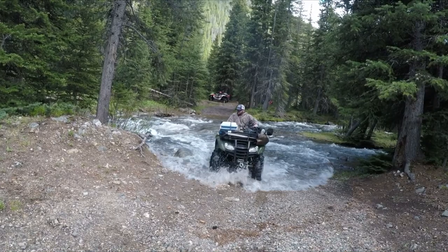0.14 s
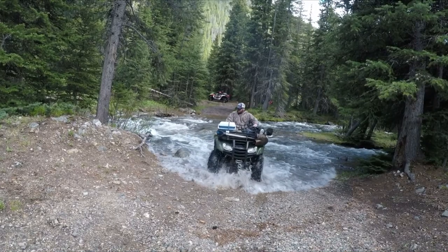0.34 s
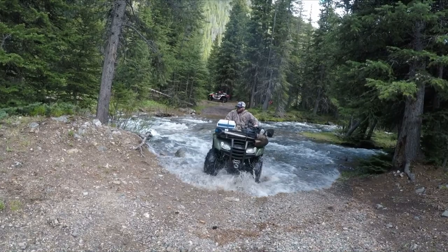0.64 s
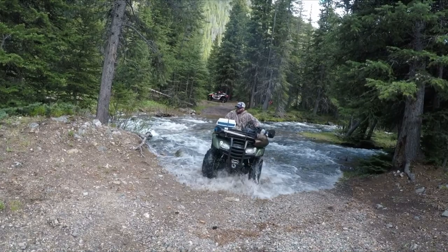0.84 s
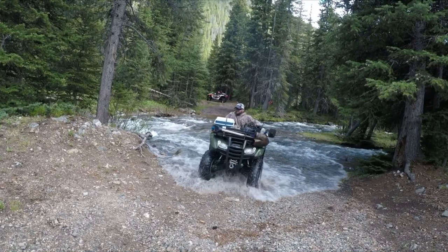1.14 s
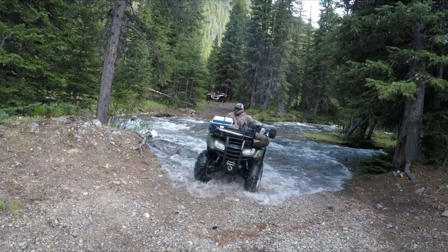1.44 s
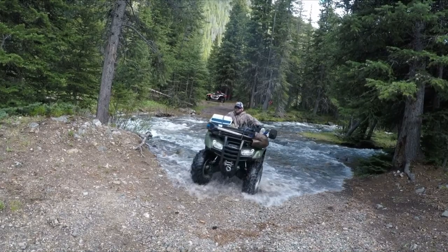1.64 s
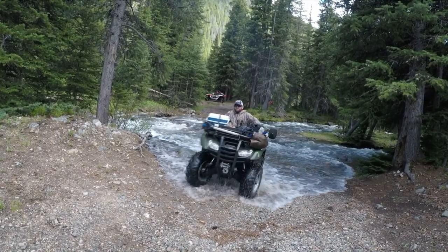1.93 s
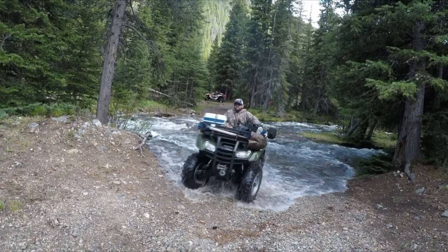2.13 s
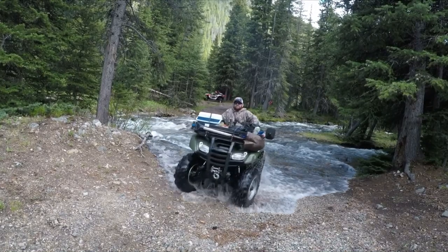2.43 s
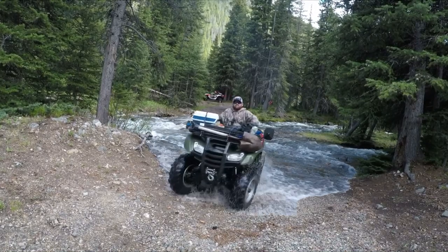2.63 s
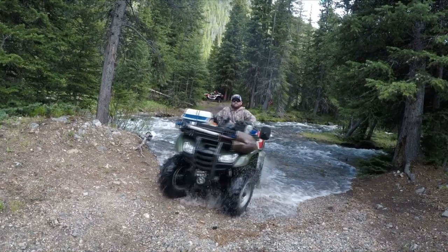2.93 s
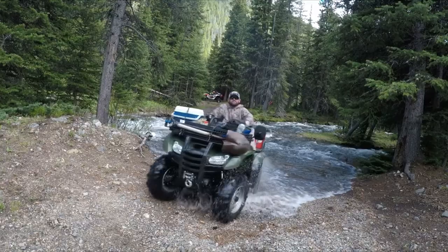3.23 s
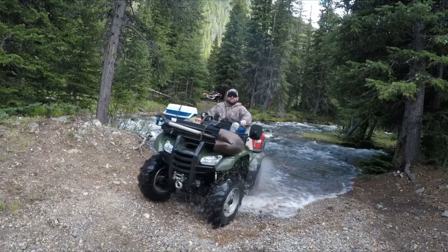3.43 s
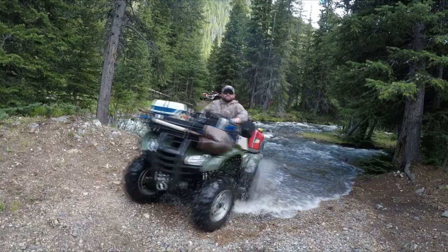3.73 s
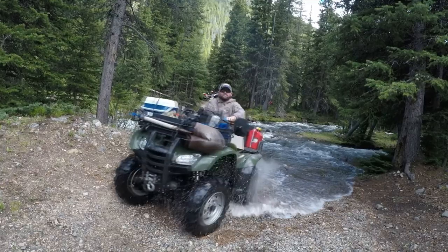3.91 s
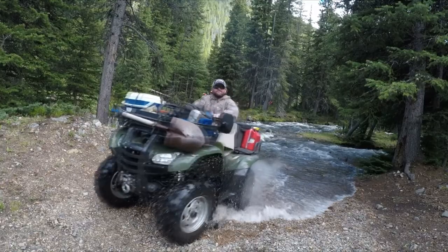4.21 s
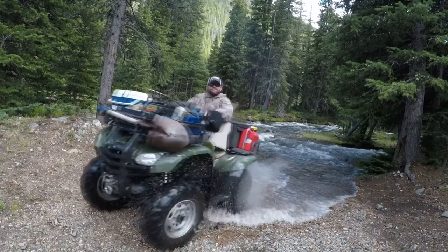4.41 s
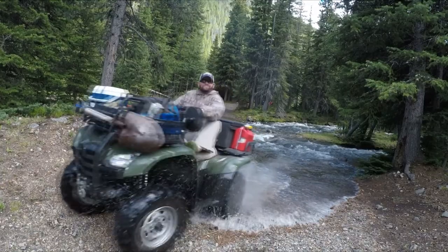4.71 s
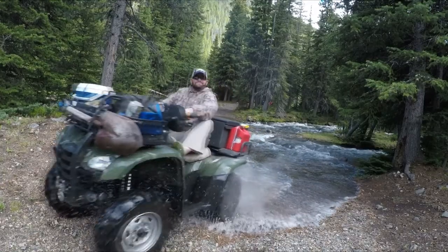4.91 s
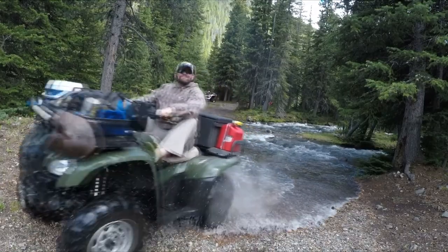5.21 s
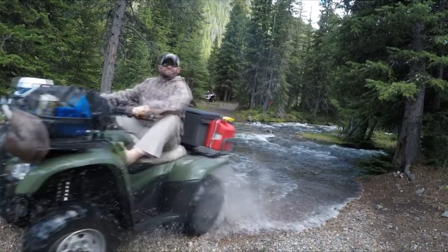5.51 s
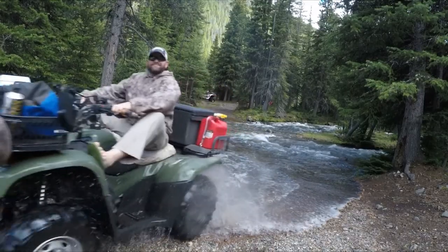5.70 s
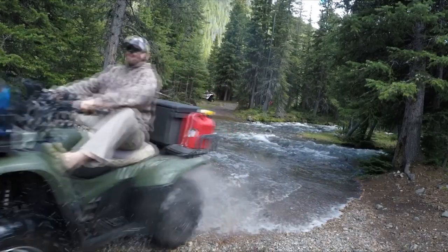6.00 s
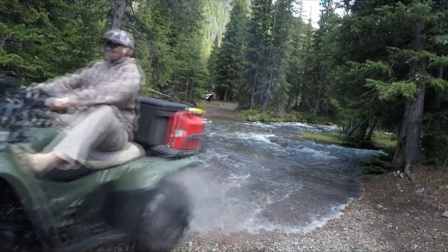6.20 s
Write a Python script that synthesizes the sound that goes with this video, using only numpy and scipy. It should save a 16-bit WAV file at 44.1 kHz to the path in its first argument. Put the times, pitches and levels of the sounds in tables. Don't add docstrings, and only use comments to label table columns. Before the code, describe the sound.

A slow-motion outdoor scene, everything dropped in pitch and dulled above about 3.4 kHz. From 0 s, a creek rushes broadly in stereo, deep and lumpy with hollow bubbling rings, while a single-cylinder quad engine throbs very low, nearly three firings a second. Its clatter is faint at first; brief harder strokes come near 1 and 2 s, with a few dull stone knocks from 1.5 s. Around 2.3 to 2.7 s the exhaust labours with heavier huffs. The water ebbs near 3.4 s, then swells at 4 s as stones knock sharply. From 4.5 s the machine is close: a strong chug at 4.7 s, then regular puffs and metallic taps at each crank turn, nearest around 5.3 s. Knocks repeat about six times a second from 5.4 s to the end at roughly 6.35 s. Faint gritty ticks and thin mirror tones sit on top; no echo.

```python
import sys
import numpy as np
from scipy import signal
from scipy.fft import rfft, irfft
from scipy.io import wavfile
from scipy.ndimage import map_coordinates

SR = 44100
rng = np.random.default_rng(int(sys.argv[2]) if len(sys.argv) > 2 else 0)


def bounce(signal):
    frames = np.transpose(np.atleast_2d(signal))
    limited = np.clip(frames, -1, 1)
    pcm = np.round(limited * 32767).astype(np.int16)
    wavfile.write(sys.argv[1], SR, pcm)


def elevation(decibels):
    levels = np.asarray(decibels, float)
    return 10 ** (levels / 20)


N = 280035
LEFT_RIGHT = np.array([[1], [-1]])


def in_time(rows):
    s, *columns = np.transpose(rows)
    return [np.interp(np.arange(N) / SR, s, column) for column in columns]


def at_hz(points, hz):
    table_hz, value = np.transpose(points)
    return np.interp(np.log(hz), np.log(table_hz), value)


def rms_one(x):
    return x / np.sqrt(np.mean(x ** 2) + 1e-20)


def drift(rate_hz):
    r = np.exp(-80 * np.pi * rate_hz / SR)
    steps = rng.standard_normal(N // 40 + 2002)
    slow = signal.lfilter([1], [1, -2 * r, r * r], steps)[2000:]
    return np.interp(np.arange(N) / 40, np.arange(len(slow)), rms_one(slow))


def resonate(x, hz, width_hz):
    r = np.exp(-np.pi * width_hz / SR)
    feedback = [1, -2 * r * np.cos(2 * np.pi * hz / SR), r * r]
    return signal.lfilter(np.array([1, 0, -1]) * (1 - r * r) / 2, feedback, x + 1e-18)


# time_s, four_stroke_cycles_per_s
ENGINE_SPEED = [
    (0, 2.82),
    (.4, 2.906),
    (1.5, 2.949),
    (2.2, 2.922),
    (2.75, 2.857),
    (4.0, 2.987),
    (5.4, 2.746),
    (5.9, 2.86),
    (6.35, 2.95),
]


def crank():
    cycles_per_s, = in_time(ENGINE_SPEED)
    return -.059 + np.cumsum(cycles_per_s) / SR


# time_s, exhaust_extra_db, frame_extra_db, case_extra_db
HARD_STROKES = [(.3, 3, 4, -1), (.96, 2.5, 1, 6.5), (1.99, 3, 4.5, 0), (2.32, 10.5, 5.5, 5),
                (2.68, 8.5, 6.5, 3.5), (3.0, 1.5, 8.5, -2), (4.38, 3, 0.5, -3), (4.73, 9.5, 2, 7),
                (4.92, 5, 3, 3), (5.09, 3, 3, 1.5), (5.26, -0.5, 4, 0.5), (5.43, 3, 5.5, 2),
                (5.61, -1.5, 1.5, 3.5), (5.78, -2, 4.5, 5), (5.96, -1.5, 2.5, 3.5), (6.12, 2.5, 7.5, 5),
                (6.29, -0.5, 6.5, 2)]


def labour():
    s, *extra_db = np.transpose(HARD_STROKES)
    t = np.arange(0, N, 100) / SR
    reach_s = .06
    bells = np.exp(-.5 * ((t[:, None] - s) / reach_s) ** 2)
    return [np.interp(np.arange(N) / SR, t, bells @ db) for db in extra_db]


# pitch_hz, left_minus_right_db
TILT = [(60, -0.5), (91, 1), (140, 1), (210, 4), (320, -6), (490, 2), (740, -2.5), (1130, 3), (1710, -1.5),
        (2600, -1.5)]


def colour(x, spectrum):
    hz = np.fft.rfftfreq(N, 1 / SR) + 1
    gain_db = at_hz(spectrum, hz) + at_hz(TILT, hz) * LEFT_RIGHT / 2
    return rms_one(irfft(rfft(x) * elevation(gain_db), N))


# pitch_hz, likeness
LIKENESS = [(40, .8), (85, .5), (150, .3), (240, 0), (400, .55), (700, .85), (950, .95), (1300, .8),
            (1850, .3), (2600, -.05)]


def patchy_noise(patchy_db, grains=0, count=17):
    out, together = 0, drift(2.5)
    edges = 18 * 2 ** (np.arange(count) / 2)
    white = rng.standard_normal((2, 2, N))
    white[:, 0] += grains
    for k, (low, high) in enumerate(zip(edges, edges[1:])):
        band = signal.butter(2, [low, high], "band", fs=SR, output="sos")
        mid, side = signal.sosfilt(band, white[k % 2])
        alike = np.clip(at_hz(LIKENESS, np.sqrt(low * high)), -1, 1)
        stereo = np.sqrt(1 + alike) * rms_one(mid) + np.sqrt(1 - alike) * rms_one(side) * LEFT_RIGHT
        flicker = elevation(patchy_db * (0.4 * together + drift(15.0)))
        out = out + flicker * stereo * (high - low) ** .5
    return out


def bubbles(per_s, cycles):
    sizes = elevation(2.5 * np.minimum(rng.exponential(1, N), 4)) * rng.choice([-1, 1], N)
    bursts = sizes * (rng.random(N) < per_s / SR)
    pitches, dealt = np.geomspace(250, 2200, 18), rng.integers(0, 18, N)
    return rms_one(sum(resonate(bursts * (dealt == k), hz, 2.2 * hz / cycles)
                       for k, hz in enumerate(pitches)))


# pitch_hz, level_db (per Hz)
WATER = [(20, -21.5), (45, 1), (85, -2), (125, -8.5), (250, -13.5), (400, -14), (613, -16), (1000, -9.5),
         (1800, -26.5), (2070, -34.5), (2790, -43.5), (3020, -40), (3300, -26), (3450, -70.5)]
# time_s, level_db
FLOW = [
    (0, -1),
    (1.0, 0),
    (1.7, -0.4),
    (2.6, 0.8),
    (3.4, -1.5),
    (4.0, 1.4),
    (4.8, 1.2),
    (5.6, -1.5),
    (6.35, -0.6),
]


def rush():
    flow_db, = in_time(FLOW)
    water = patchy_noise(1.0, grains=0.23 * bubbles(per_s=850, cycles=8.0))
    return elevation(-32.5 + flow_db) * colour(water, WATER)


# pitch_hz, level_db (per Hz)
CHURN = [(18, -4), (30, -6), (45, 3.5), (90, -4), (170, -7), (350, -8.5), (500, -9.5), (900, -29.5),
         (2000, -60)]


def churn(exhaust_db):
    return elevation(-35.0 + 0.46 * exhaust_db) * colour(patchy_noise(2.2, count=13), CHURN)


# order (multiple of the firing rate), left_db, right_db
ORDERS = [(1, -43, -44), (2, -28, -28), (3, -28, -27), (4, -14, -14), (5, -31, -30), (6, -33, -33),
          (7, -37, -38), (8, -27, -33), (9, -38, -36), (10, -40, -39), (11, -42, -43), (12, -33, -34),
          (13, -39, -42), (14, -36, -37), (15, -41, -43), (16, -38, -41)]
CREST, CREST_DRIFT = .75, .0012


def throb(cycle):
    out = np.zeros((2, N))
    for order, left_db, right_db in ORDERS:
        turned = np.pi if order in (3, 8, 9) else 0
        ahead = 1.0 if order in (2, 6, 7, 8) else 0
        wobble_db = (.4 if order == 4 else 1.8) * drift(.15 * order)
        angle = 2 * np.pi * order * (cycle - CREST - CREST_DRIFT * order) + turned + ahead
        angle = angle + (.9 if order % 2 and order > 8 else .15) * drift(1.0)
        lead = (.45 if order in (8, 16) else -.4 if order in (5, 6) else -.1) * LEFT_RIGHT
        level_db = np.array([[left_db], [right_db]]) + wobble_db
        out += np.sqrt(2) * elevation(level_db) * np.cos(angle + lead)
    return out


def gate(cycle, opens, rise, fall):
    since = (cycle - opens) % 1
    return (1 - np.exp(-since / rise)) * np.exp(-since / fall)


def through(x, modes):
    return rms_one(sum((-1) ** k * elevation(db) * resonate(x, hz, width_hz)
                       for k, (hz, width_hz, db) in enumerate(modes)))


# pitch_hz, width_hz, level_db
SILENCER = [(117, 20, -1), (172.5, 35, 3), (381, 66, -2.5)]
# pitch_hz, width_hz, level_db
TAILPIPE = [(61, 1.5, -5.5), (65.5, 10, 1.5), (93, 12, 1.5)]


def huffs(cycle, exhaust_db):
    gas = rng.standard_normal((2, N)) + .7 * rng.standard_normal(N)
    blow = gate(cycle, .63, 0.079, .08) + elevation(-8.0) * gate(cycle, .16, 0.016, 0.09)
    boom = elevation(-33 + 0.23 * exhaust_db) * through(gas * blow, TAILPIPE)
    return boom + elevation(-39.5 + exhaust_db) * through(gas * blow, SILENCER)


# pitch_hz, width_hz, level_db
CASE = [(845, 230, -5.5), (1068, 73, 0), (1205, 97, -3.5), (1290, 1400, -21)]
# pitch_hz, width_hz, level_db
FRAME = [(345, 91, -3.5), (494, 59, 1), (535, 220, -5.5)]


def clatter(cycle, frame_db, case_db):
    taps = rng.standard_normal(N) * elevation(2.0 * drift(90.0)) + .3 * rng.standard_normal((2, N))
    turn = 2 * cycle
    hold = np.clip(3 - 6 * ((turn - .24) % 1), .1, 1)
    rattle = taps * gate(turn, .24, .02, .4) * hold
    bright = elevation(-35.5 + case_db) * through(rattle, CASE)
    return bright + elevation(-35.5 + frame_db) * through(rattle, FRAME)


# time_s, distance_m
APPROACH = [
    (0, 14),
    (2.5, 7.8),
    (3.5, 9.4),
    (4.5, 3.4),
    (5.3, 2.78),
    (6.35, 3.6),
]


def strokes(cycle, exhaust_db, frame_db, case_db):
    distance_m, = in_time(APPROACH)
    near_db = -20 * np.log10(np.clip(distance_m, 1, None))
    engine = elevation(near_db) * clatter(cycle, frame_db, case_db) + elevation(0.36 * near_db) * huffs(cycle, exhaust_db)
    return signal.sosfilt(signal.butter(4, 1400, fs=SR, output="sos"), engine)


# start_s,
# level_db (peak), pitch_hz
KNOCKS = [(1.527, -22, 900), (2.068, -19, 1050), (2.539, -21, 1000), (4.016, -19, 1050), (4.119, -15, 1005),
          (4.352, -30, 301), (5.417, -16, 490), (5.592, -18, 1000), (5.756, -17, 980), (5.932, -19, 960),
          (6.096, -15, 1000), (6.098, -17, 518), (6.26, -15.5, 498)]


def knocks():
    out, t = np.zeros(N + SR), np.arange(SR // 10) / SR
    rise_s, ring_cycles = .001, 4.0
    for s, peak_db, hz in KNOCKS:
        at = round(s * SR)
        shape = (1 - np.exp(-t / rise_s)) * np.exp(-t * hz / ring_cycles)
        out[at:at + len(t)] += elevation(peak_db - 4) * np.sin(2 * np.pi * hz * t) * shape
    return out[:N]


def scene():
    cycle = crank()
    exhaust_db, frame_db, case_db = labour()
    creek = rush() + churn(exhaust_db)
    engine = elevation(0.26) * throb(cycle) + strokes(cycle, exhaust_db, frame_db, case_db)
    return creek + engine + knocks()


def slow_playback(dry):
    run_in = np.concatenate([dry[:, 200:0:-1], dry], axis=1)
    low_pass = signal.cheby2(10, 45, 3600, fs=SR, output="sos")
    dull = signal.sosfilt(low_pass, 1.6 * np.tanh(run_in / 1.6))[:, 200:]
    stream_hz = 12000
    steps = np.arange(N * stream_hz // SR + 1) * SR / stream_hz
    stream = [map_coordinates(side, [steps], order=3, mode="nearest") for side in dull]
    return np.array([np.interp(np.arange(N), steps, side) for side in stream])


# start_s, level_db (peak), left_minus_right_db
TICKS = [(0.003, -44, 0), (0.151, -49, 0), (0.321, -51, 0), (0.876, -51, 0), (1.025, -51, 0),
         (1.089, -51, 0), (1.132, -51, 0), (1.857, -51, 1), (1.879, -51, -2), (2.838, -51, 0),
         (3.69, -52, 0), (2.348, -50, 2), (2.540, -43, 0), (2.860, -50, -1), (4.076, -47, 7),
         (4.247, -51, -2), (4.524, -51, 2), (4.588, -48, 0), (4.929, -49, 0), (5.164, -50, 0),
         (5.250, -48, 6), (5.420, -38.5, -9), (5.612, -51, 7), (6.273, -49, 1), (6.295, -49, 0),
         (6.337, -48, 0)]


def joint_ticks(sound):
    block_s, first_joint_s = 1024 / 48000, .00256
    joints = np.round(np.arange(first_joint_s, N / SR, block_s) * SR).astype(int)
    back = rng.choice([.32, .44, .57, .69], len(joints))
    inner = joints - np.round(back * block_s * SR).astype(int)
    slope, slips = np.gradient(sound, axis=1), np.zeros((2, N))
    chance = rng.uniform(.1, 1, (2, len(joints)))
    slips[:, joints] = elevation(-35) * np.tanh(elevation(47) * slope[:, joints] * chance)
    chance = rng.random((2, len(inner))) ** 2
    slips[:, inner] = elevation(-42) * np.tanh(elevation(47) * slope[:, inner] * chance)
    for s, peak_db, pan_db in TICKS:
        nearest = joints[np.argmin(abs(joints - s * SR - 50))]
        slips[:, nearest] = elevation(peak_db + 11 + pan_db * np.array([.5, -.5]))
    slips += elevation(-85.0 + 3.0 * drift(18.0)) * rng.standard_normal((2, N))
    soft = np.repeat(rng.random(N // 400 + 1), 400)[:N] ** 3
    slips = slips * (1 - soft) + signal.lfilter([.3, .4, .3], [1, -.3], slips * soft)
    return signal.lfilter([.75, .25], [1, -.8], slips)


def roll_off(x):
    return signal.sosfilt(signal.butter(12, 15800, fs=SR, output="sos"), x)


def record(dry):
    out = slow_playback(dry)
    out += joint_ticks(out)
    left_s = np.arange(N)[::-1] / SR
    out = out * np.clip(.3 + left_s / .003, 0, 1)
    return roll_off(out)


dry = scene()
out = record(dry)
bounce(out)
```